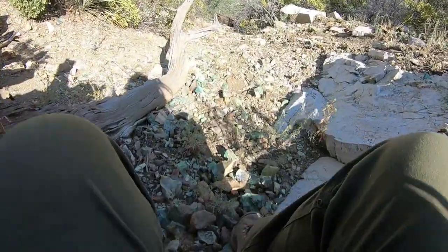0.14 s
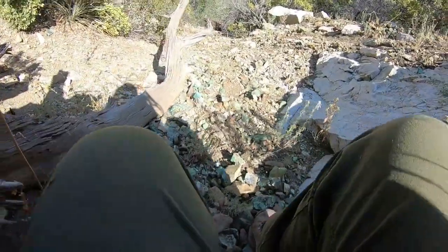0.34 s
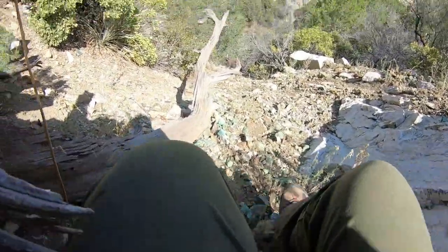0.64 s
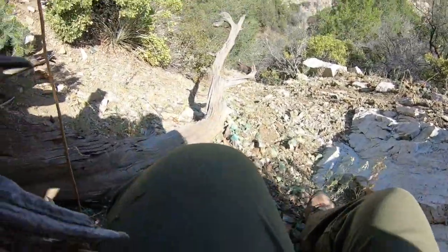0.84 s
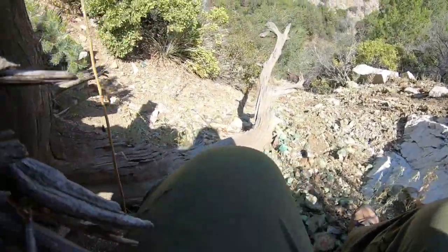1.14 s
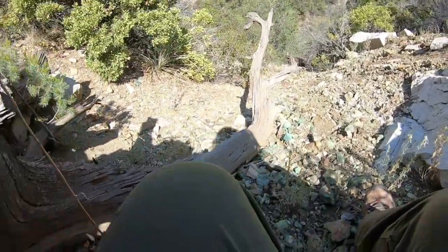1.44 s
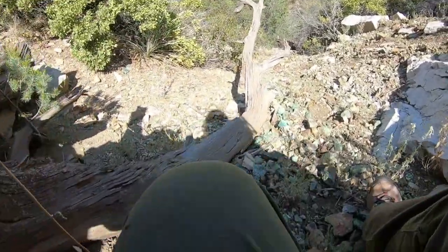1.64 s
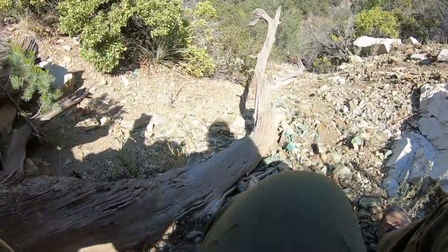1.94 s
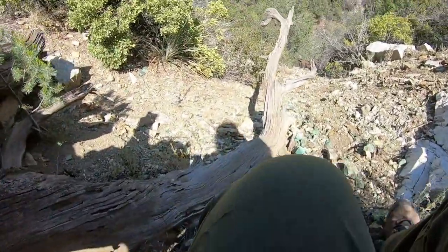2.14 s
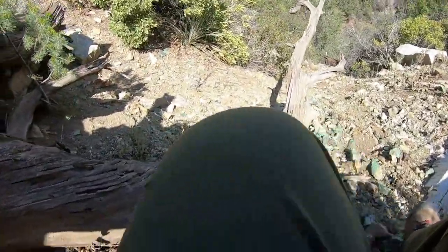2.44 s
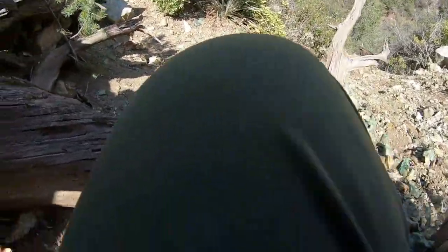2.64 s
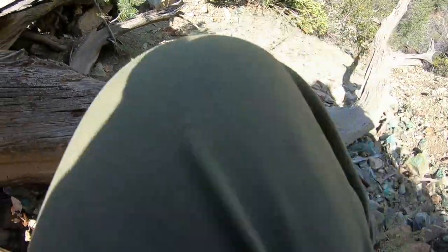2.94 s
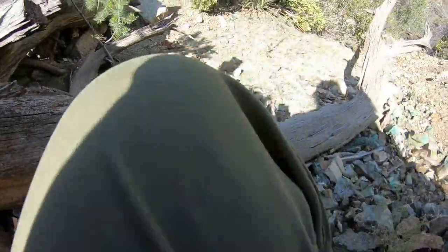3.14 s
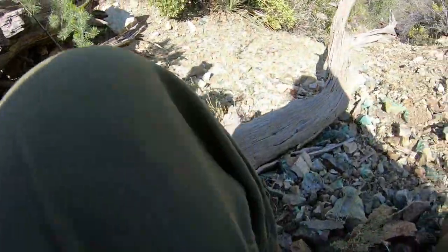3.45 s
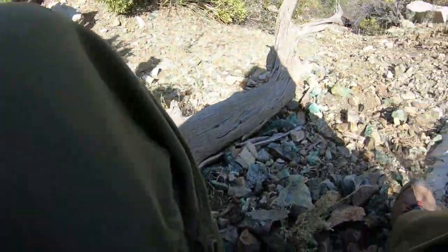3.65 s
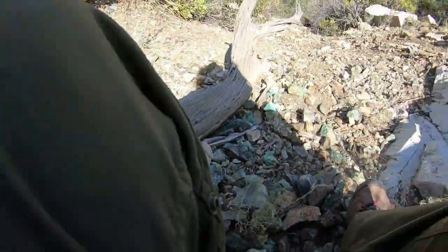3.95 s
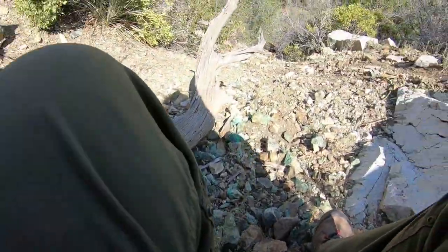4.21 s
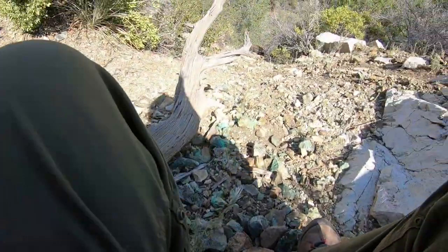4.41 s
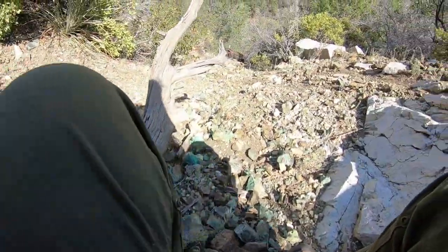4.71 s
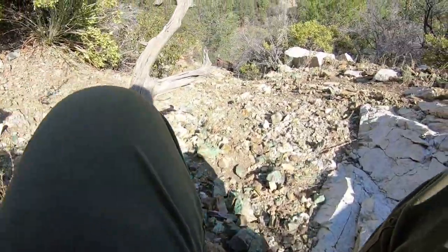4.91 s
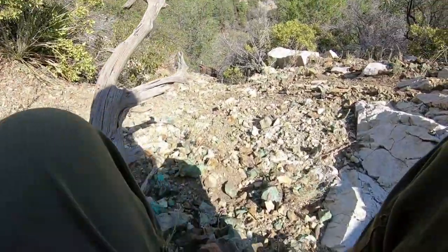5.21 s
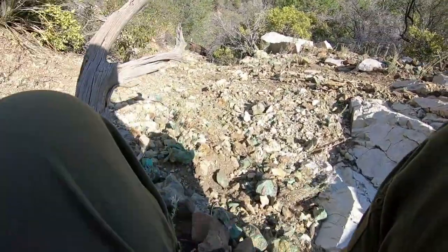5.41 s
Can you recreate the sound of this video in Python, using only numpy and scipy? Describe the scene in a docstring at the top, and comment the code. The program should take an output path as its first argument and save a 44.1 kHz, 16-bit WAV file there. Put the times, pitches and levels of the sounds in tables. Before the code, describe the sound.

Boots dig into stony debris, trousers hiss, and dry rocks clack over a grinding bed of gravel and sand. Low wind and motion rumble buffet the body-worn microphones, with brief rushes of air. The movement surges, slows, tumbles heavily around two seconds, nearly stops, then resumes from about four seconds and continues to the end. Open air, dry and close, with coarse debris mostly leaning right.

```python
"""Stones, gravel, grit and sand grind as someone slides down a steep slope of loose rock, louder with speed:
two early pushes, a slow quiet lull and a long last slide. Boots shove the debris and trousers hiss over it.
Single rocks clack, chink, scrape, rub and thud: noise bursts, damped sines and gliding bands of noise.
Low noise makes the wind on two microphone ports worn on the body, with rushes of hissing air.
The stereo image is almost mono at the start, opens wide, closes through the lull and opens again."""
import sys
import numpy as np
from scipy import signal
from scipy.fft import rfft, irfft, next_fast_len
from scipy.io import wavfile
from scipy.ndimage import map_coordinates

SR = 44100
rng = np.random.default_rng(int(sys.argv[2]) if len(sys.argv) > 2 else 0)


def materialize(psi):
    """Save the field psi as 16-bit PCM at rate SR to the path in sys.argv[1].

    A 1-D psi becomes a single channel; in a 2-D psi each row is a channel.
    """
    bounded = np.clip(np.atleast_2d(psi).T, -1, 1)
    quanta = np.round(bounded * 32767).astype(np.int16)
    wavfile.write(sys.argv[1], SR, quanta)


N = 245681

# how fast the body slides: (t/s, speed/dB re full speed)
SPEED = [(0, -6.5), (.15, -3), (.28, -8.5), (.5, -4.5), (.65, 0.5), (.85, -9.5), (1.1, -14.5), (1.5, -11),
         (1.7, -8.5), (1.91, -7.5), (2.04, -3.5), (2.52, -15.5), (3.01, -16), (3.2, -15), (3.5, -14.5),
         (3.82, -12), (4.03, -6.5), (4.36, -11.5), (4.42, -9.5), (4.72, -5.5), (5.2, -5), (5.57, -5.5)]
# stereo image: (t/s, width 0-1, left-right balance of the debris/dB)
IMAGE = [(0, 0.03, 0), (.45, 0.75, -6), (1.35, 1, -7.5), (2.4, 1, -13.5), (2.85, 0.14, 4), (3.4, 0, 5),
         (4.33, .01, -13), (4.5, 0.5, -3), (4.9, 0.7, -12), (5.57, 0.8, -11)]
# treble colour of the ports: (f/Hz, gain/dB)
PORT = [(1000, 16.5), (7500, 12), (9500, 2.5), (11200, -2.5), (13000, 1), (16000, -8)]


def amp(db):
    """Decibels to gain."""
    return 10 ** (np.asarray(db) / 20)


def unit(x):
    """Scale to rms 1."""
    return x / np.sqrt(np.mean(x ** 2) + 1e-20)


def along(points, hz):
    """Read (f/Hz, value) points on a log frequency axis."""
    f, values = np.transpose(points)
    return np.interp(np.log(hz + 1), np.log(f + 1), values)


def curves(rows):
    """One value per sample for each column after the time."""
    s, *columns = np.transpose(rows)
    return [np.interp(np.arange(N) / SR, s, column) for column in columns]


def wobble(rate):
    """A smooth random curve with rate knots a second."""
    knots = rng.standard_normal(int(N * rate / SR) + 4)
    return map_coordinates(knots, [np.arange(N) * rate / SR])


def panned(balance_db):
    """Left and right gains whose mean is 1."""
    ratio = amp(np.atleast_1d(balance_db))
    return 2 * np.array([ratio, np.ones_like(ratio)]) / (1 + ratio)


def coloured(x, gain):
    """Causal minimum-phase filter, by cepstrum, with the given gain as a function of frequency."""
    n = x.shape[-1]
    m = 2 * next_fast_len(n // 2 + 2048)
    cepstrum = irfft(np.log(np.maximum(gain(np.fft.rfftfreq(m, 1 / SR)), 1e-6)))
    # folding onto positive time makes the filter causal
    cepstrum[1:m // 2] *= 2
    cepstrum[m // 2 + 1:] = 0
    return irfft(rfft(x, m) * np.exp(rfft(cepstrum)), m)[..., :n]


def resonance(f, hz, q):
    """Gain of one broad resonance."""
    return 1 / np.sqrt(1 + (q * (f / hz - hz / (f + 1))) ** 2)


def spread(pair):
    """Two unrelated signals become left and right, whose likeness varies with frequency."""
    # (f/Hz, left-right likeness)
    alike = [(200, 0.85), (600, 0.8), (1300, 0.56), (2800, 0.9), (4500, 0.83), (9000, .02)]

    def side_gain(f):
        likeness = np.clip(along(alike, f), -.9, .99)
        return np.sqrt((1 - likeness) / (1 + likeness))

    mid = coloured(pair[0], np.ones_like)
    side = coloured(pair[1], side_gain)
    return np.array([mid + side, mid - side])


def add(out, s, sound):
    """Mix a stereo sound in at time s."""
    start = max(round(s * SR), 0)
    part = out[:, start:start + sound.shape[-1]]
    part += sound[:, :part.shape[-1]]


def swell(s, half_s):
    """A gain that rises to 1 at time s and falls more slowly."""
    release, shape = 1.57, 1.19  # fall over rise time; 1 = pointed, 2 = rounded
    u = (np.arange(N) / SR - s) / half_s
    return np.exp(-np.minimum(np.maximum(-u, u / release), 10) ** shape)


def swells(rows):
    """The summed power of (t/s, half length/s, level/dB) swells, as a gain."""
    return np.sqrt(sum((amp(db) * swell(s, half_s)) ** 2 for s, half_s, db in rows))


def driven(full_db, grow):
    """The gain of a sound that follows the slide: dB at full speed, and dB gained per dB of speed."""
    return amp(full_db + grow * curves(SPEED)[0])


def wind():
    """Eddies rumble on each port separately: a light breeze, deep heaves, gusts and single low buffets."""
    # rumble colour: (f/Hz, level/dB)
    rumble_colour = [(12, -73), (20, 12), (81, -5.5), (139, -7), (172, -14), (200, -14), (300, -31.5),
                     (390, -28.5), (660, -120)]
    # gusts: (t/s, half length/s, level/dB, left-right balance/dB)
    gust_rows = [(0.667, 0.057, -26, 8), (0.935, 0.04, -30, 6.5), (1.027, 0.046, -39.5, -26),
                 (1.548, 0.16, -45.5, -8), (1.814, .09, -40.5, 0), (1.981, 0.073, -27, -17.5),
                 (2.06, 0.024, -21, -7), (2.18, 0.029, -26, -25), (2.28, 0.076, -30.5, -2),
                 (2.39, 0.02, -24, -25), (2.623, 0.053, -41, -5.5), (4.004, 0.088, -37.5, 4),
                 (4.98, 0.031, -35, -2), (5.079, 0.027, -31, -8), (5.284, 0.043, -34.5, -1)]
    # slow heaves of air press on the ports: (t/s, half length/s, level/dB)
    heave_rows = [(.7, 0.08, -33), (.96, 0.04, -40), (1.62, 0.2, -43.5), (2.19, 0.091, -32),
                  (2.4, 0.044, -35), (4.99, 0.15, -34.5), (5.51, .04, -41)]
    # wind pockets burst on a port: (t/s, level/dB, f/Hz, left-right balance/dB)
    buffet_rows = [(.648, -18, 72, 11), (.691, -12, 97, 27), (.945, -27.5, 58, 14), (2.06, -13, 72, -26),
                   (2.194, -8, 79.7, -18), (2.397, -12, 77, -15)]
    breeze_side_db, gust_low_hz, heave_hz = -9, 76, 35.4  # gusts thin out below gust_low_hz

    def rumble(f):
        return amp(along(rumble_colour, f))

    def eddies(gain):
        noise = coloured(rng.standard_normal((2, N)), gain)
        return unit(noise * amp(np.array([wobble(25), wobble(25)])))

    # the breeze comes from the body's own motion
    breeze = eddies(rumble) * driven(-46, grow=0.58) * panned(breeze_side_db)
    gust_power = sum((amp(db) * panned(side_db) * swell(s, half_s)) ** 2
                     for s, half_s, db, side_db in gust_rows)
    out = np.sqrt(gust_power) * eddies(lambda f: rumble(f) * f ** 2 / (f ** 2 + gust_low_hz ** 2))
    t = np.arange(SR // 8) / SR
    for s, db, hz, side_db in buffet_rows:
        push = np.cos(2 * np.pi * hz * t) * np.exp(-hz * t) * (1 - np.exp(-t / .0007))
        add(out, s, amp(db) * panned(side_db) * push)
    heave_eddies = eddies(lambda f: resonance(f, heave_hz, q=1.25) ** 2)
    heaves = swells(heave_rows) * panned(breeze_side_db) * heave_eddies
    return breeze + heaves + out


def rush():
    """Fast air and flung grit sound the hollows behind the ports and, for a moment, a thin whistle."""
    # the body lurches and dusty air rushes across the ports: (t/s, half length/s, level/dB)
    rush_rows = [(.665, 0.087, -42), (1.36, 0.28, -55.5), (2.02, 0.053, -44), (2.17, 0.08, -51),
                 (5.25, 1, -63)]
    # port resonances: (f/Hz, width/Hz, level/dB)
    cavities = [(515, 160, 4), (860, 110, 1), (2355, 270, 12.5), (3720, 1800, -1), (5000, 300, 1.5),
                (6500, 460, -6), (7580, 240, 3)]
    # whistle: (t/s, half length/s, level/dB)
    whistle_rows = [(.628, 0.022, -45.5)]

    def hollow(f):
        return np.sqrt(sum((amp(db) * resonance(f, hz, hz / width / 2.0) ** 2) ** 2
                           for hz, width, db in cavities))

    specks = rng.standard_normal((2, N)) * (rng.random(N) < 800 / SR)  # about 800 a second
    air = amp(-1) * rng.standard_normal((2, N))
    hiss = unit(coloured(unit(specks) + air, hollow))
    whistle = unit(coloured(rng.standard_normal((2, N)), lambda f: resonance(f, 5025, q=17) ** 2))
    return spread(hiss * swells(rush_rows) * amp(1.6 * wobble(40.1)) + whistle * swells(whistle_rows))


def rubs():
    """Fine ridges slip past each other: a narrow band of chatter with a gliding pitch."""
    # a sole or trouser leg rubs over a slab:
    # (t/s, half length/s, level/dB, f/Hz, glide/octaves per s, left-right balance/dB)
    rub_rows = [(1.338, 0.02, -52.5, 1800, -5, 12), (1.945, .007, -56, 7700, -3, -14),
                (3.81, .06, -62, 4500, -1, 0), (4.02, 0.026, -68, 7000, -1, 0),
                (4.97, .025, -49, 7000, -2, -14)]
    half_width, chatter_db = 0.13, 2.5  # half width of the band over its pitch; depth of catch and slip
    out, t = np.zeros((2, N)), np.arange(N) / SR
    for s, half_s, db, hz, glide, balance_db in rub_rows:
        pitch = hz * 2 ** np.clip(glide * (t - s), -1, 1)
        smooth = signal.butter(2, half_width * hz, fs=SR)
        drift = signal.lfilter(*smooth, rng.standard_normal(N) + 1j * rng.standard_normal(N))
        band = unit((drift * np.exp(2j * np.pi * np.cumsum(pitch) / SR)).real)
        out += amp(db + chatter_db * wobble(150)) * swell(s, half_s) * band * panned(balance_db)
    return out


def scrapes():
    """A quick run of slips swells and dies; big, low rocks sound hollow and sharp edges hiss widely."""
    # a rock drags briefly over another: (t/s, level/dB, f/Hz, length/s, left-right balance/dB)
    scrape_rows = [(0.128, -44.5, 2100, 0.033, -3), (0.684, -35.5, 565, .008, 6),
                   (1.213, -44, 2200, 0.0033, -10), (1.381, -37, 3020, 0.002, 4),
                   (1.725, -32.5, 800, 0.0029, -23), (1.76, -30, 920, 0.003, -17),
                   (1.781, -45, 800, 0.0055, -11), (1.828, -38, 750, .005, -17),
                   (1.859, -39.5, 816, 0.0051, -23), (2.111, -45.5, 820, 0.019, -4),
                   (2.183, -41, 784, 0.0037, -10), (2.192, -26.5, 496, 0.0044, 0),
                   (2.388, -43, 2000, 0.0066, 9), (3.077, -46, 2180, 0.0087, -5),
                   (3.116, -41, 5000, 0.014, 0), (3.2, -56, 3200, 0.058, 0), (3.324, -48.5, 1990, 0.034, 3),
                   (3.447, -46.5, 1820, 0.0087, 6), (3.655, -46.5, 3900, 0.044, 2),
                   (4.911, -38, 740, .004, -12)]
    out = np.zeros((2, N))
    for s, db, hz, length, balance_db in scrape_rows:
        u = np.arange(SR // 8) / SR / length
        slips = rng.standard_normal((2, len(u))) * amp(6.1 * rng.standard_normal(len(u)))
        rasp = unit(coloured(slips, lambda f: resonance(f, hz, q=2200 / hz) * amp(along(PORT, f))))
        envelope = 2 * u * np.exp(.5 - 2 * u ** 2)
        add(out, s, amp(db) * panned(balance_db) * spread(rasp * envelope))
    return out


def chinks():
    """A flat stone, free to vibrate, cracks and rings briefly in its few modes."""
    # a flat stone is knocked free: (t/s, level/dB, f/Hz, t60/s, left-right balance/dB)
    chink_rows = [(1.7765, -26, 790, 0.039, -14), (2.391, -28.5, 860, 0.086, 2),
                  (2.888, -35.5, 1540, .018, 0), (2.92, -30, 1750, .012, 1), (4.2006, -29, 3220, 0.018, -2),
                  (4.207, -22, 3140, 0.009, -1), (5.341, -18.5, 2370, 0.008, -3),
                  (5.376, -24.5, 2020, 0.012, -4), (5.505, -14.5, 2270, 0.011, -4.5)]
    # modes of a flat stone: (multiple of the pitch, mean level/dB)
    stone_modes = [(.84, 0), (1, 8.5), (1.11, 1), (1.42, 0), (1.98, -2)]
    out, t = np.zeros((2, N)), np.arange(SR // 16) / SR
    for s, db, hz, t60, balance_db in chink_rows:
        modes = sum(amp(level + rng.normal(0, 0.76)) * np.sin(2 * np.pi * hz * ratio * t)
                    for ratio, level in stone_modes)
        ring = modes * amp(-60 * t / t60)
        crack = amp(-9) * rng.standard_normal((2, len(t))) * amp(-60 * t / 0.0044)
        add(out, s, amp(db) * panned(balance_db) * (ring + crack) / np.abs(ring).max())
    return out


def contact(hz, t60, q, scuff_db, ring_db, ring_t60):
    """A blow on a rock: a scuff as it lands, a sharp push and crack after 1 ms, then a brief ring; peak 1."""
    t = np.arange(SR // 12) / SR - .001
    since = np.abs(t)
    force = rng.standard_normal((2, len(t))) * amp(np.where(t < 0, scuff_db, 0) - 60 * since / t60)
    force[0, np.argmin(since)] += 6
    modes = hz * np.exp(rng.normal(0, 0.276, size=(4, 1)))
    ring = np.sin(2 * np.pi * modes * t).sum(0) * amp(ring_db - 60 * since / ring_t60)
    force[0] += ring * (t > 0)
    sound = spread(coloured(force, lambda f: resonance(f, hz, q) * amp(along(PORT, f))))
    return sound / np.abs(sound.mean(0)).max()


def clacks():
    """Hard, dead rocks hardly ring; small chips have a clearer pitch."""
    # rock strikes rock: (t/s, peak/dB, f/Hz, left-right balance/dB)
    clack_rows = [(0.0688, -26, 5360, -3), (0.1276, -27, 5250, -3), (.156, -38, 1750, -2),
                  (0.178, -22, 3320, -12), (0.216, -19.5, 4800, -1), (0.305, -29, 2330, -20),
                  (0.3499, -27.5, 2000, -7), (0.356, -33, 2400, -1), (.396, -30, 1810, -2.5),
                  (0.4666, -17, 3720, -5), (0.5331, -25, 1670, 9), (0.8705, -30.5, 2170, -7),
                  (0.989, -31.5, 3300, -6), (1.005, -32, 5070, -1.5), (1.0565, -37, 3460, -5),
                  (1.1078, -34.5, 6240, -5), (1.214, -37, 5500, -10), (1.321, -30.5, 2430, 1.5),
                  (1.3786, -28, 3800, 9), (1.615, -29, 4300, -6), (1.695, -29.5, 1460, -15),
                  (1.853, -27, 3600, 0), (1.859, -32, 2620, -11), (1.9395, -33, 2920, -8),
                  (2.012, -35, 2120, 5), (2.076, -29, 2640, -2.5), (2.099, -32, 2800, 0),
                  (2.133, -33, 4300, -1), (2.1635, -29, 2560, -1), (2.19, -31, 2070, -4),
                  (2.2639, -29.5, 2370, -9), (2.2987, -30, 2560, -7), (2.332, -33, 2480, -9),
                  (2.378, -33, 2200, 2), (2.9448, -41, 1510, 0), (2.97, -43, 2200, 0),
                  (3.0428, -35, 3940, 0), (3.079, -34, 2820, -3), (3.104, -36, 2010, 3),
                  (3.121, -33, 4270, 0), (3.1799, -33.5, 2100, -1), (3.185, -35, 3520, 0),
                  (3.383, -34.5, 2380, 0), (3.405, -32, 1950, -1), (3.4462, -41, 1900, 5),
                  (3.561, -34.5, 4250, -1), (4.6577, -35, 6800, -19), (5.142, -32, 2600, -11),
                  (5.253, -34, 2720, 3), (5.447, -33.5, 2200, 4), (5.467, -39, 6500, 0),
                  (5.527, -28, 6820, 0), (5.552, -25, 1930, -3.5)]
    out = np.zeros((2, N))
    for s, db, hz, balance_db in clack_rows:
        blow = contact(hz, t60=.009, q=max(1.6, hz / 3200), scuff_db=-19, ring_db=-24, ring_t60=.035)
        add(out, s, amp(db) * panned(balance_db) * blow)
    return out


def thuds():
    """A heavy stone drops into its bed: a few low cycles and a dull crunch, higher for smaller stones."""
    # heavy stones settle: (t/s, level/dB, f/Hz, left-right balance/dB, decay/cycles of rocking)
    thud_rows = [(.155, -22, 487, -4, 0.71), (0.409, -21, 277, -2, 3.2), (0.5082, -19.5, 300, -2, 1.5),
                 (0.6091, -19, 365, -1, 1.5), (0.6875, -14, 248, -21, 1.06), (0.8839, -16, 233, -5, 1.4),
                 (1.058, -29.5, 200, -18, 2.9), (1.464, -26, 227, -6, 0.82), (1.5843, -21, 284, -3, 1.8),
                 (1.671, -14.5, 300, -4, 1), (1.696, -11, 302, -3, 1.76), (1.776, -17, 403, -2, 0.63),
                 (1.861, -15.5, 312, -1, 1.25), (2.1926, -10, 322, -28, 1.8), (2.2619, -20, 308, -27, 1),
                 (2.829, -29.5, 327, 5, 1.7), (3.082, -29, 203, -3, 2.3), (3.3875, -33, 192, 15, 3.7),
                 (4.6955, -20, 800, -19, 1.5), (4.7255, -21, 616, -9, 1.7), (4.8447, -23, 606, -25, 1.3),
                 (4.927, -19.5, 594, -8, 1.6), (5.2095, -12.5, 634, -23, 1.9)]
    out, t = np.zeros((2, N)), np.arange(SR // 10) / SR
    for s, db, hz, balance_db, cycles in thud_rows:
        body = np.sin(2 * np.pi * hz * t) * np.exp(-hz * t / cycles) * (1 - np.exp(-t / 0.0008))
        crumbs = rng.standard_normal((2, len(t))) * amp(-60 * t / 0.025)
        crunch = coloured(crumbs, lambda f: resonance(f, 240 + 0.63 * hz, q=2.0) ** 2)
        crunch_pair = spread(crunch) / np.abs(crunch).max()
        thud = amp(-3.5) * body + amp(-10.5) * crunch_pair
        add(out, s, amp(db) * panned(balance_db) * thud)
    return out


def grains(rate, low_hz, high_hz, cycles, size_db):
    """Tiny collisions in clumps: damped rings of random pitch and size, as two unrelated mixes."""
    flow = np.cumsum(amp(4 * wobble(45)))
    draw = rng.random((int(rate * N / SR), 5))
    start = np.searchsorted(flow, draw[:, 0] * flow[-1])
    hz = low_hz + (high_hz - low_hz) * draw[:, 1:2]
    size = amp(size_db * np.minimum(-np.log(1 - draw[:, 2]), 4.5))  # a few are much larger
    k = np.arange(min(int(2 * cycles * SR / low_hz), 900))
    ring = hz * np.sin(2 * np.pi * hz * k / SR) * np.exp(-2 * hz * k / SR / cycles)
    places = (start[:, None] + k).ravel()

    def mix(weight):
        return unit(np.bincount(places, (weight[:, None] * ring).ravel(), N)[:N])

    return np.array([mix(size * np.sign(draw[:, 3] - .5)), mix(size * (draw[:, 4] - .5))])


def debris(gain, low_hz, high_hz, rate, cycles, size_db, rub_db, flutter_db):
    """One size of debris: collisions over a bed of rubbing noise, with a fluttering level."""
    # debris colour: (f/Hz, level/dB)
    debris_colour = [(71, -54.5), (120, 3.5), (166, 8.5), (301, 2.5), (392, 0.5), (739, -9.5),
                     (1260, -19.5), (1740, -20.5), (3560, -28), (4830, -31.5), (6180, -24), (7730, -30.5),
                     (10900, -45.5), (13700, -38.5), (15800, -51)]

    def colour(f):
        band = ((1 + (low_hz / (f + 1)) ** 10) * (1 + (f / high_hz) ** 10)) ** -.5
        return band * amp(along(debris_colour, f))

    knocks = grains(rate, low_hz * 0.756, min(high_hz * 1.216, SR / 2), cycles, size_db)
    # faster debris rubs a little more: 0.1 dB per dB of speed
    rubbing = driven(rub_db, grow=0.1) * rng.standard_normal((2, N))
    pair = unit(coloured(knocks + rubbing, colour) * amp(flutter_db * wobble(70)))
    return spread(pair) * gain


def slide():
    """Speed stirs the debris and boots shove it; smaller debris rings higher and collides more often."""
    # a boot digs in and shoves: (t/s, half length/s, stones/dB, gravel/dB, grit/dB)
    shoves = np.array([(0.137, 0.018, -35, -42, -55), (0.438, 0.021, -39, -67, -64),
                       (0.647, 0.023, -48, -47, -53), (0.92, 0.082, -45.5, -77.5, -71),
                       (1.657, 0.047, -35, -42.5, -49.5), (1.849, 0.057, -39, -40.5, -47.5),
                       (2.015, 0.021, -33, -38, -42.5), (2.172, 0.029, -31, -38.5, -46),
                       (2.27, 0.015, -35, -40, -50), (2.42, 0.023, -42.5, -47, -62),
                       (2.62, 0.016, -45.5, -53, -59), (3.985, 0.057, -45.5, -40, -57),
                       (4.41, 0.013, -49, -45, -55), (4.485, 0.076, -46, -43, -66),
                       (4.985, 0.24, -43, -37, -49.5), (5.263, 0.085, -39.5, -38, -51)])
    # trousers drag over the ground and hiss: (t/s, half length/s, level/dB)
    drag_rows = [(1.25, 0.49, -54), (1.68, 0.2, -51.5), (2.15, 0.031, -53), (4.66, 0.02, -52.5)]
    stones_gain = np.hypot(driven(-36.5, grow=1.11), swells(shoves[:, :3]))
    gravel_gain = np.hypot(driven(-41.5, grow=1), swells(shoves[:, [0, 1, 3]]))
    grit_gain = np.hypot(driven(-44, grow=1), swells(shoves[:, [0, 1, 4]]))
    sand_gain = driven(-48, grow=1)
    lean_db = curves(IMAGE)[1]
    stones = debris(stones_gain, 146.0, 428.0, rate=330, cycles=2.3,
                    size_db=2.0, rub_db=9.5, flutter_db=0.0)
    gravel = debris(gravel_gain, 463, 958, rate=500, cycles=2.93,
                    size_db=1.5, rub_db=6.5, flutter_db=1.5)
    grit = debris(grit_gain, 1146, 4690, rate=1100, cycles=4.1,
                  size_db=2.0, rub_db=4.0, flutter_db=1.13)
    sand = debris(sand_gain, 3400, 20000, rate=2100, cycles=2.3,
                  size_db=5.0, rub_db=2.0, flutter_db=1.24)
    cloth = debris(swells(drag_rows), 6160, 9600, rate=1500, cycles=1.5,
                   size_db=3.5, rub_db=3.5, flutter_db=1.5)
    coarse = (stones + gravel) * panned(0.68 * lean_db)
    return coarse + grit * panned(0.77 * lean_db) + sand + cloth


def scene():
    """All layers in the open air: no walls answer."""
    return wind() + rush() + rubs() + scrapes() + chinks() + clacks() + thuds() + slide()


def record(dry):
    """Put the two ports out of step, narrow and recolour the image, and cut all above the band limit."""
    # where the left port leads: (f/Hz, level/dB)
    lead_band = [(150, -39), (600, -2.5), (1050, 5), (2000, -1), (4500, -3.5), (7000, 2.5), (9500, 3)]
    # colour when the image is closed: (f/Hz, gain/dB)
    mono_colour = [(60, -6), (110, -3), (155, 2), (260, -3), (450, 1.5), (1100, 3), (1700, -1),
                   (2900, -4.5), (4300, -1), (6000, -1.5), (8000, -3.5), (11000, -7.5), (14000, 1.5)]
    lead, top_hz = 0.58, 15850  # how far the left port leads in the open image; band limit
    width = np.clip(curves(IMAGE)[0], 0, 1)
    m = next_fast_len(N + SR // 2)
    hz = np.fft.rfftfreq(m, 1 / SR)
    mid, side = dry.mean(0), (dry[0] - dry[1]) / 2
    # a quarter-turn copy of the middle in the side puts the two ports out of step
    turned = irfft(rfft(mid, m) * 1j * amp(along(lead_band, hz)), m)[:N]
    side = width * (side + lead * turned)
    closed = np.clip(1 - 2 * width, 0, 1)
    mono = coloured(mid, lambda f: amp(along(mono_colour, f)))
    mid = (1 - closed) * mid + closed * mono
    return irfft(rfft([mid + side, mid - side], m) * (hz < top_hz), m)[:, :N]


dry = scene()
out = record(dry)
materialize(out)
```